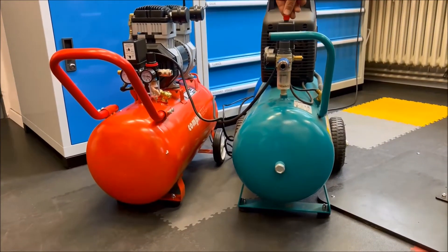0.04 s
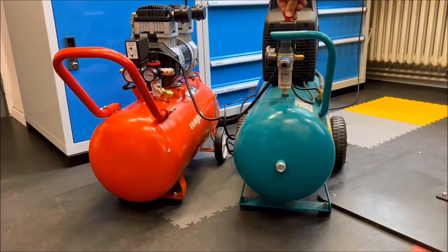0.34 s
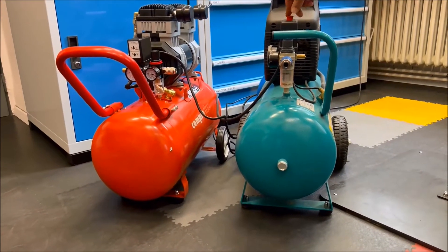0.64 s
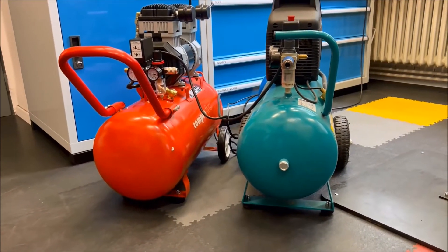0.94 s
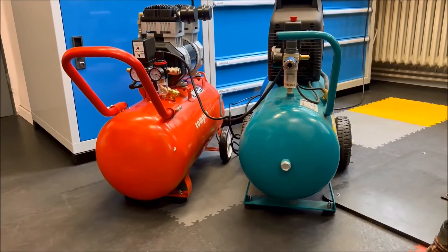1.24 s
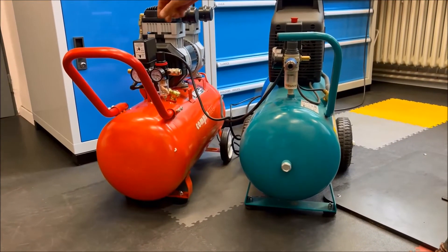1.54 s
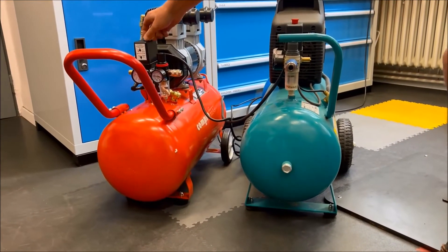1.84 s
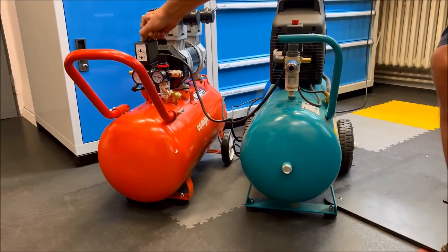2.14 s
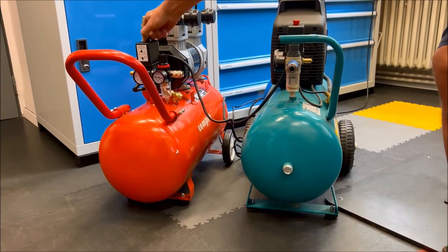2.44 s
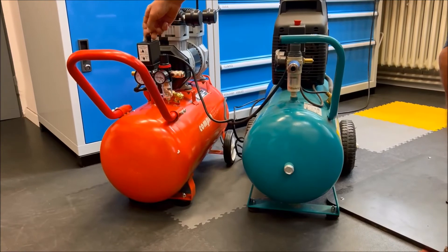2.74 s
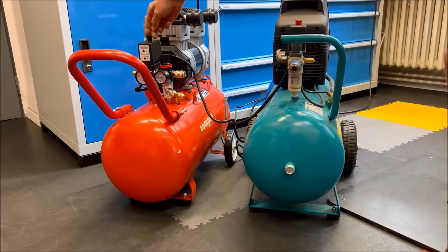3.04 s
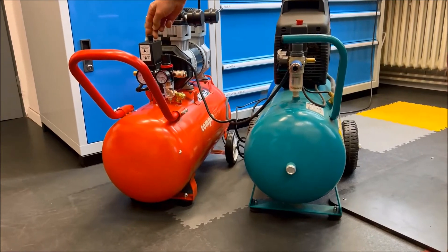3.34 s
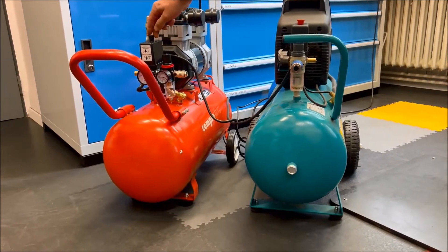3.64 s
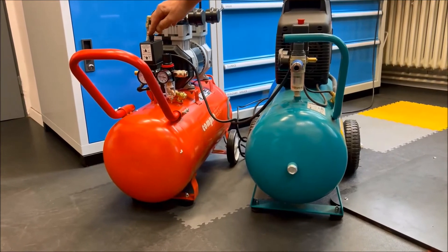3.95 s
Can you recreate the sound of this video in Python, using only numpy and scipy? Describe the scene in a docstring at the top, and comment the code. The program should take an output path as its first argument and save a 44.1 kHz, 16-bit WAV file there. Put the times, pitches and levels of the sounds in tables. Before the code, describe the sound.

An air compressor winds down, then a switch snaps and a second one starts throbbing.

```python
"""The drone of a fast piston compressor fills a workshop. It is switched off and coasts down, its intake
reed honking on the last strokes and its tank ringing on. After a few handling knocks a pressure switch
snaps, and a second portable compressor, a slower twin-piston pump, spins up to a steady throb with valve
chatter, air hiss and a fan whine. Drones are shaft harmonics, clatter and hiss are noise surging with the
shaft, and struck parts ring as decaying modes."""
import sys
import numpy as np
from scipy import signal
from scipy.fft import rfft, irfft, next_fast_len
from scipy.io import wavfile
from scipy.ndimage import uniform_filter1d, map_coordinates

SR = 44100
rng = np.random.default_rng(int(sys.argv[2]) if len(sys.argv) > 2 else 0)


def bounce(signal):
    """Save signal as a 16-bit WAV file at the path given by the first command-line argument."""
    frames = np.transpose(np.atleast_2d(signal))
    limited = np.clip(frames, -1, 1)
    pcm = np.round(limited * 32767).astype(np.int16)
    wavfile.write(sys.argv[1], SR, pcm)


N = 176400
TIME = np.arange(N) / SR
SWITCH_ON_S = 2.2685


def undb(db):
    """Decibels to gain."""
    return 10 ** (np.asarray(db) / 20)


def unit(x):
    """Scale to rms 1."""
    return x / np.sqrt(np.mean(x ** 2))


def fader(rows):
    """Gain ride through (time_s, level_db) points."""
    return undb(np.interp(TIME, *np.array(rows).T))


def drift(rate_hz):
    """Smooth random wander, spread near 1."""
    wander = np.interp(TIME * rate_hz, np.arange(400), rng.standard_normal(400))
    return 1.3 * uniform_filter1d(wander, int(SR / rate_hz))


def eq(x, rows):
    """Minimum-phase EQ through (freq_hz, gain_db) points."""
    hz, db = np.array(rows, float).T
    size = next_fast_len(N + 8192, True)
    freqs = np.maximum(np.fft.rfftfreq(size, 1 / SR), 1)
    cepstrum = irfft(np.log(undb(np.interp(np.log(freqs), np.log(hz), db))), size)
    cepstrum[1:size // 2] *= 2
    cepstrum[size // 2 + 1:] = 0
    return irfft(rfft(x, size) * np.exp(rfft(cepstrum)), size)[..., :N]


def widen(pair):
    """Mid and side to stereo: widest in the midrange, the left 3 samples late."""
    mid, side = pair
    side = signal.sosfilt(signal.butter(1, [400, 5940], "band", fs=SR, output="sos"), side)
    return np.array([np.roll(mid + side, 3), mid - side])


def noise_bed(spectrum):
    """Steady coloured stereo noise."""
    return widen(unit(eq(rng.standard_normal((2, N)), spectrum)))


def decay(start, t60):
    """Hard attack, exponential tail."""
    age = TIME - start
    return (age >= 0) * np.exp(-np.log(1000) * np.clip(age / t60, 0, 10))


def ring(modes, start):
    """Struck modes, each reaching the two ears in its own phase."""
    out = 0
    for hz, db, t60 in modes:
        cycles = hz * (TIME - start) + rng.random() + 0.099 * rng.random((2, 1))
        out += undb(db) * decay(start, t60) * np.sin(2 * np.pi * cycles)
    return out


def burst(start, t60, spectrum):
    """A crack of coloured noise that dies away."""
    noise = rng.standard_normal((2, N))
    return widen(eq(noise * decay(start, t60), spectrum) / eq(noise[0], spectrum).std())


def in_room(x, send_db, low_t60_s=.72, treble_t60_s=.53):
    """The sound plus a diffuse workshop tail, shorter in the treble."""
    t = np.arange(SR) / SR
    noise = rng.standard_normal((2, SR))
    low = signal.sosfilt(signal.butter(4, 3500, fs=SR, output="sos"), noise)
    tail = low * 1e-3 ** (t / low_t60_s) + (noise - low) * 1e-3 ** (t / treble_t60_s)
    tail *= t > .004  # pre-delay
    return x + undb(send_db) * signal.fftconvolve(x, unit(tail) / np.sqrt(SR), axes=1)[:, :N]


# Room tone colour: freq_hz, gain_db
AIR_EQ = [(25, 1), (100, -4), (320, -10.5), (900, -20.5), (2000, -21), (3400, -29.5), (7000, -35.5),
          (15000, -50.5)]

def room_tone():
    """Quiet, dark workshop air."""
    return undb(-63 + .5 * drift(2)) * noise_bed(AIR_EQ)


# Knocks: start_s, level_db, pitch_hz, t60_s
KNOCKS = [(1.314, -52, 397, 0.043), (1.547, -53, 790, 0.077), (1.787, -43, 893, 0.022),
          (2.082, -55.5, 633, 0.07)]
# Finger taps: start_s, level_db, t60_s
TAPS = [(1.48, -68.5, 0.78), (1.788, -52.5, 0.062), (1.806, -54.5, 0.17)]
# Tap colour: freq_hz, gain_db
TAP_EQ = [(59, -45), (100, -7), (355, 0.5), (682, -6.5), (1290, -2.5), (3000, -9), (8230, -19.5),
          (9740, -10), (15500, -22)]

def handling():
    """Soft handling knocks and fingers on the switch cap."""
    knocks = sum(ring([(hz, db, t60)], start) for start, db, hz, t60 in KNOCKS)
    taps = sum(undb(db) * burst(start, t60, TAP_EQ) for start, db, t60 in TAPS)
    return knocks + taps


# Snap colour: freq_hz, gain_db
SNAP_EQ = [(59, -67.5), (100, -18.5), (541, -16.5), (917, -11), (1160, -3.5), (2750, -10), (3690, -1.5),
           (4500, -10), (8410, -13), (9950, -23), (15500, -25)]
# Housing modes: pitch_hz, relative_db, t60_s
HOUSING_MODES = [(616, -2.5, 0.091), (1144, 3.5, 0.12), (1200, -2.5, 0.14), (1546, -3.5, 0.17),
                 (1700, -2, 0.084), (2074, -8, 0.19), (3170, -9, 0.21), (3710, -15, 0.14)]

def pressure_switch():
    """The switch snaps and rings its housing."""
    snap = undb(-16) * burst(SWITCH_ON_S, t60=.035, spectrum=SNAP_EQ)
    return snap + undb(-29) * ring(HOUSING_MODES, SWITCH_ON_S)


# Squeak cues: start_s, length_s, pitch_hz, level_db
SQUEAKS = [(0, .055, 2990, -36), (.425, .05, 2520, -41), (.455, .09, 6000, -43), (.508, .026, 1100, -34),
           (.642, .046, 1055, -38)]

def squeaks():
    """Brief wavering squeaks of the fast pump."""
    out = 0
    for start, length, hz, db in SQUEAKS:
        progress = np.clip((TIME - start) / length, 0, 1)
        envelope = undb(db) * np.sqrt(np.abs(np.sin(np.pi * progress)))
        cycles = np.cumsum(hz * (1 + .0024 * drift(90))) / SR
        out += np.sqrt(2) * envelope * np.sin(2 * np.pi * cycles)
    return out


# Suction strokes: start_s, length_s, pitch_hz, level_db, overtone_lift_db
HONKS = [(.42, 0.057, 356.5, -20.5, 1.5), (0.467, 0.046, 355.4, -24.5, 3.5),
         (.506, .044, 359.5, -17.5, 1.5), (0.554, 0.055, 354.6, -19.5, 1), (0.607, .03, 345.3, -20.5, -1),
         (0.652, 0.0757, 348.5, -19, -6.5)]
# Reed harmonics, fundamental first: relative_db
REED_PARTIALS = [0, -10.5, -26, -40]

def intake_honks(ramp_s=.017, sag_hz_per_s=68):
    """The intake reed flutters roughly on each suction stroke as the fast pump coasts."""
    out = np.zeros((2, N))
    jitter = .058 * drift(95.94)
    flicker = undb(2.14 * drift(90.85))
    for start, length, hz, db, lift_db in HONKS:
        age = TIME - start
        envelope = np.clip(np.minimum(age, length - age) / ramp_s, 0, 1) * flicker
        on = envelope > 0
        cycles = hz * age[on] - sag_hz_per_s * age[on] ** 2 / 2 + jitter[on]
        for k, partial_db in enumerate(REED_PARTIALS, 1):
            gain = np.sqrt(2) * undb(db + partial_db + lift_db * (k > 1))
            ear_offset = .13 * rng.random((2, 1))
            out[:, on] += gain * envelope[on] * np.sin(2 * np.pi * k * (cycles + ear_offset))
    return in_room(out, send_db=-7.5)


# Tank modes: pitch_hz, level_db, t60_s
TANK_MODES = [(334, -35, 0.59), (348, -34, 1.13), (685, -47, .45), (1250, -60, 1.4)]

def tank_ring():
    """The air tank rings on after the last stroke."""
    return ring(TANK_MODES, start=.72)


def shaft_drone(turns, harmonics, waver_db, dull_db=0):
    """Shaft harmonics; higher ones are wider and lose dull_db per multiple."""
    out = 0
    for k, db in harmonics:
        ear_phase = np.array([[1], [-1]]) * min(k * .022, .6) * rng.choice([-1, 1])
        gain = undb(db + waver_db * drift(11) - k * dull_db)
        out += gain * np.sin(2 * np.pi * (k * turns + rng.random()) + ear_phase)
    return np.sqrt(2) * out


def chatter(turns, shaft_hz, spectrum, repeat, depth, surges):
    """Valve and bearing noise that partly repeats each turn and pulses `surges` times a turn."""
    samples_into_turn = (TIME - np.interp(np.floor(turns), turns, TIME)) * SR
    loops = rng.standard_normal((2, int(2 * SR / shaft_hz)))
    looped = [map_coordinates(loop, [samples_into_turn], order=3, mode="wrap") for loop in loops]
    looped = signal.sosfilt(signal.butter(3, 420, "high", fs=SR, output="sos"), looped)
    noise = np.sqrt(repeat) * looped + np.sqrt(1 - repeat) * rng.standard_normal((2, N))
    pulse = 1 + depth * np.exp(-(turns * surges % 1) / .089)
    return widen(unit(eq(noise * pulse, spectrum)))


# Drone harmonics: shaft_multiple, level_db
FAST_HARMONICS = [(1, -34), (2, -31.5), (3, -37), (4, -38.5), (5, -36.5), (6, -44), (7, -21.5), (8, -30),
                  (11, -41), (12, -37), (13, -40), (14, -32), (15, -34.5), (19, -42), (23, -42)]
# Clatter and hiss colours: freq_hz, gain_db
FAST_CLATTER_EQ = [(30, -13), (70, 1.5), (200, 6), (450, -2.5), (900, -4.5), (1700, -8), (2700, -7.5),
                   (3500, -14.5), (6000, -37.5), (15000, -36)]
FAST_HISS_EQ = [(500, -30.5), (2500, -13), (4000, -1.5), (5600, 2), (8200, 0.5), (9300, -7), (12000, -9),
                (14300, -4), (16000, -17.5)]
# Their fader rides: time_s, level_db
FAST_CLATTER_RIDE = [(0, -28), (.38, -29), (.5, -33), (.58, -38), (.68, -49), (.73, -53), (.85, -63),
                     (1.2, -115)]
FAST_HISS_RIDE = [(0, -33.5), (.36, -34.5), (.39, -29.5), (.48, -32), (.64, -37.5), (.7, -46), (.78, -55),
                  (.88, -63), (1.15, -125)]

def fast_pump(shaft_hz=47.82, off_s=.38, coast_s=.4, fall_db_per_s=92.5, dull_db_per_s=30.5):
    """A single piston drones, clatters and hisses, then sinks and dulls as it coasts."""
    speed = np.clip(1 - (TIME - off_s) / coast_s, .1, 1)
    turns = np.cumsum(shaft_hz * speed * (1 + .001 * drift(7.3))) / SR
    fading_s = np.maximum(TIME - .404, 0)
    drone = shaft_drone(turns, FAST_HARMONICS, waver_db=.43, dull_db=dull_db_per_s * fading_s)
    drone *= undb(-fall_db_per_s * fading_s)
    clatter = chatter(turns, shaft_hz, FAST_CLATTER_EQ, repeat=.82, depth=2.4, surges=4)
    hiss = chatter(turns, shaft_hz, FAST_HISS_EQ, repeat=.2, depth=.85, surges=1)
    noise = clatter * fader(FAST_CLATTER_RIDE) + hiss * fader(FAST_HISS_RIDE)
    return drone + in_room(noise, send_db=-9)


def fan_whine(turns, blades=34, left_bias_db=18, swell_s=.4):
    """The twin pump's blade-passing tone swells in on the left."""
    gain = np.sqrt(2) * undb(-47.5 + .4 * drift(35))
    pan = undb(np.array([[1], [-1]]) * left_bias_db / 2)
    swell = np.clip((TIME - SWITCH_ON_S) / swell_s, 0, 1) ** 2
    return gain * pan * swell * np.sin(2 * np.pi * blades * turns)


def mains_growl(pitch_hz=216, length_s=.135, ramp_s=.014):
    """A short electrical tone as the motor starts."""
    age = TIME - SWITCH_ON_S
    envelope = np.clip(np.minimum(age, length_s - age) / ramp_s, 0, 1)
    return undb(-52) * envelope * np.sin(2 * np.pi * pitch_hz * TIME)


# Rush colour: freq_hz, gain_db
RUSH_EQ = [(180, -34), (300, -7), (500, -4), (1100, -10), (3510, -6.5), (7370, -3.5), (8990, -7),
           (9930, -18), (15500, -20)]
# Its fader ride: time_s, level_db
RUSH_RIDE = [(2.262, -130), (2.275, -33), (2.33, -38), (2.38, -32), (2.41, -41), (2.48, -49), (2.62, -63),
             (3, -120)]

def startup_rush():
    """A scraping rush while the motor gathers speed."""
    return noise_bed(RUSH_EQ) * fader(RUSH_RIDE) * undb(1.36 * drift(90))


# Slap rhythm within a turn: position_turns, relative_db
SLAPS = [(0, -2.5), (.19, -4), (.36, -8.5)]
# Cylinder head modes: pitch_hz, relative_db, t60_s
HEAD_MODES = [(1400, -34, .035), (1970, -42, .03), (2950, -45, .04), (3450, -41, .05), (3850, -40, .06)]

def valve_slaps(turns, jitter_turns=.003):
    """A quick run of uneven valve slaps in each turn rings the cylinder head."""
    slaps = 0
    for position, db in SLAPS:
        count = np.floor(np.maximum(turns - position + jitter_turns * drift(30), 0))
        slaps += np.diff(count, prepend=0) * undb(db + 2.3 * rng.standard_normal(N))
    t = np.arange(SR // 10) / SR
    head = 0
    for hz, db, t60 in HEAD_MODES:
        cycles = hz * t + .21 * rng.random((2, 1))
        head += undb(db) * 1e-3 ** (t / t60) * np.sin(2 * np.pi * cycles)
    return signal.fftconvolve(slaps[None], head, axes=1)[:, :N]


# Throb harmonics: shaft_multiple, relative_db
TWIN_HARMONICS = [(2, -38), (4, -32.5), (5, -52), (6, -51), (7, -48.5), (8, -39.5), (9, -44), (11, -49),
                  (12, -46.5), (14, -53.5), (18, -55.5), (36, -50)]
# Clatter and hiss colours: freq_hz, gain_db
TWIN_CLATTER_EQ = [(30, -10.5), (70, 2.5), (250, 6), (370, 0), (570, 4.5), (800, 4), (980, -6), (1120, 1),
                   (1270, -9), (1400, -6), (1700, -6), (1980, -8), (2250, -21), (2950, -6.5), (4000, -31.5),
                   (9000, -22)]
TWIN_HISS_EQ = [(800, -16.5), (2600, -12), (3300, -4), (4300, -9.5), (5100, -6), (6800, -11), (8400, -8),
                (9500, -12.5), (14300, -16.5), (16000, -21)]
# Fader rides for throb and valves, clatter, hiss: time_s, gain_db
THROB_RIDE = [(2.27, -35.5), (2.37, -18), (2.45, -8.5), (2.65, -6), (4, -3.5)]
TWIN_CLATTER_RIDE = [(2.27, -47), (2.4, -43), (2.6, -43), (4, -40)]
TWIN_HISS_RIDE = [(2.27, -52), (2.55, -46), (2.7, -43), (4, -40)]

def twin_pump(shaft_hz=23.575, spin_up_s=.17):
    """Two pistons spin up and throb; valves, hiss and fan follow the same shaft."""
    speed = np.clip((TIME - SWITCH_ON_S) / spin_up_s, 1e-6, 1)
    turns = np.cumsum(shaft_hz * speed * (1 + .00058 * drift(6))) / SR
    throb = shaft_drone(turns, TWIN_HARMONICS, waver_db=.4) * fader(THROB_RIDE)
    tones = throb + fan_whine(turns) + mains_growl()
    clatter = chatter(turns, shaft_hz, TWIN_CLATTER_EQ, repeat=.8, depth=1.3, surges=4)
    hiss = chatter(turns, shaft_hz, TWIN_HISS_EQ, repeat=.4, depth=.32, surges=2)
    noise = speed * (clatter * fader(TWIN_CLATTER_RIDE) + hiss * fader(TWIN_HISS_RIDE))
    noise += startup_rush() + valve_slaps(turns) * fader(THROB_RIDE)
    return tones + in_room(noise, send_db=-9)


# Stereo lean: freq_hz, left_minus_right_db
LEFT_BIAS = [(2800, 0), (4400, 5.5), (9000, 0.5)]

def scene():
    """Both machines over the room tone, their upper hiss leaning left."""
    mix = room_tone() + fast_pump() + squeaks() + intake_honks() + tank_ring() + twin_pump()
    left, right = mix + in_room(handling() + pressure_switch(), send_db=-2.5)
    left = eq(left, [(hz, db / 2) for hz, db in LEFT_BIAS])
    right = eq(right, [(hz, -db / 2) for hz, db in LEFT_BIAS])
    return np.array([left, right])


# Overall tone colour: freq_hz, gain_db
MASTER_EQ = [(20, -26.5), (32, -7), (44, 3.5), (9000, -1), (9900, -10.5), (10400, -13.5), (11000, -3),
             (20000, 3.5)]

def record(dry):
    """Overall tone colour: the deepest bass is dropped, a narrow dip near 10 kHz, the top is cut."""
    high_cut = signal.ellip(10, .2, 80, 15750, fs=SR, output="sos")
    return signal.sosfilt(high_cut, eq(dry, MASTER_EQ))


dry = scene()
out = record(dry)
bounce(out)
```